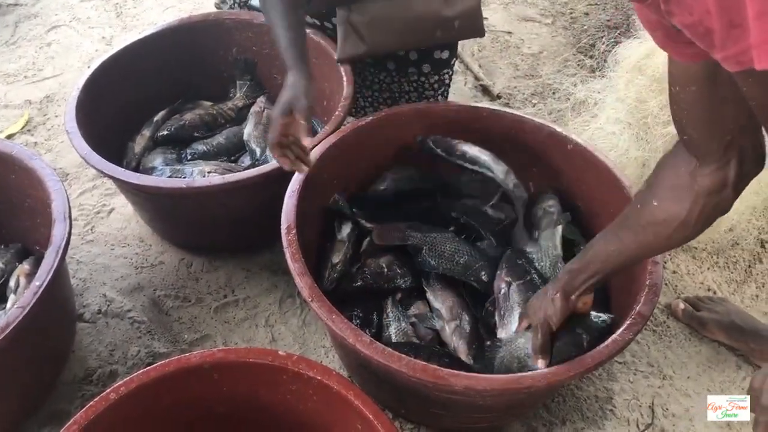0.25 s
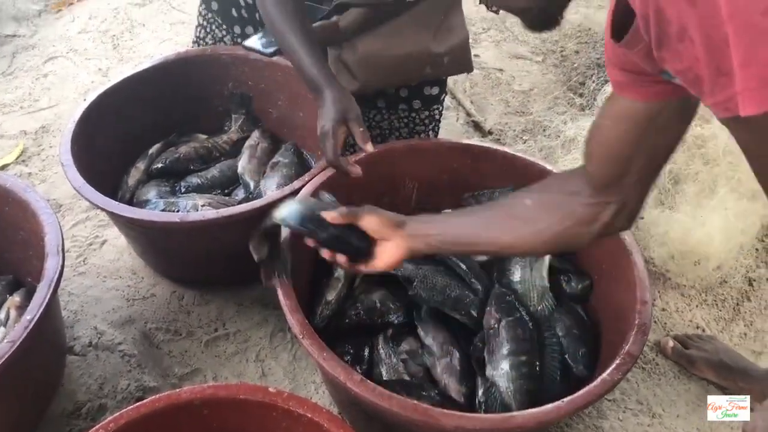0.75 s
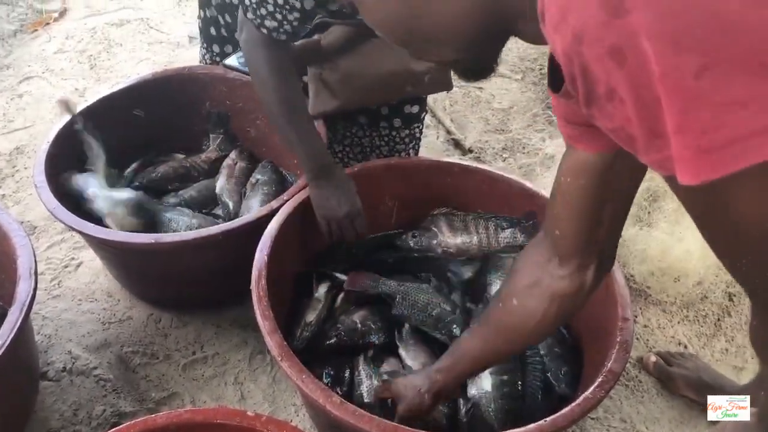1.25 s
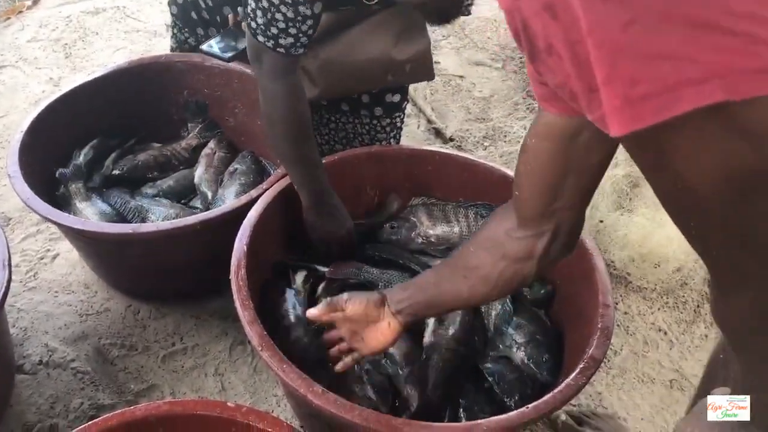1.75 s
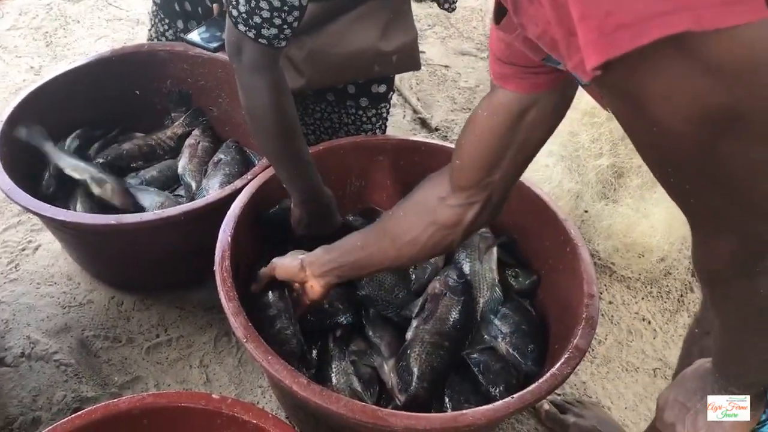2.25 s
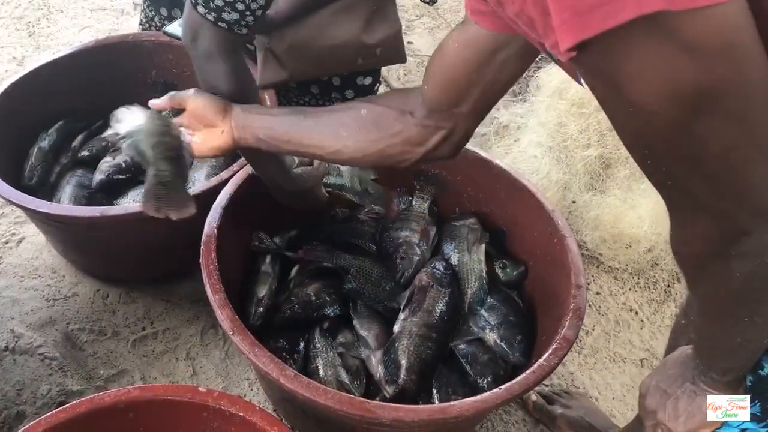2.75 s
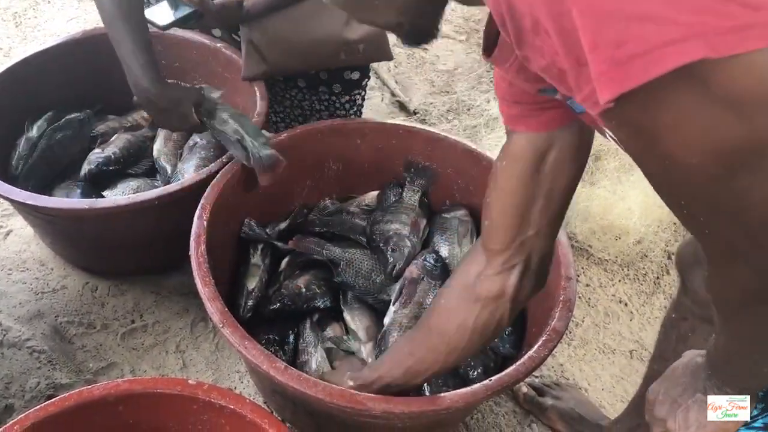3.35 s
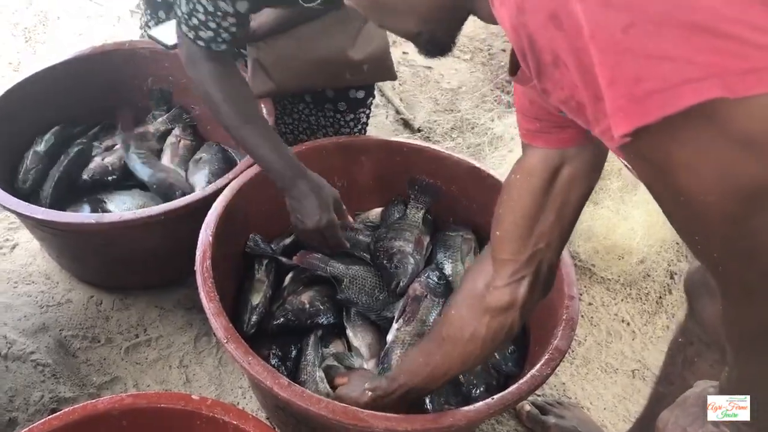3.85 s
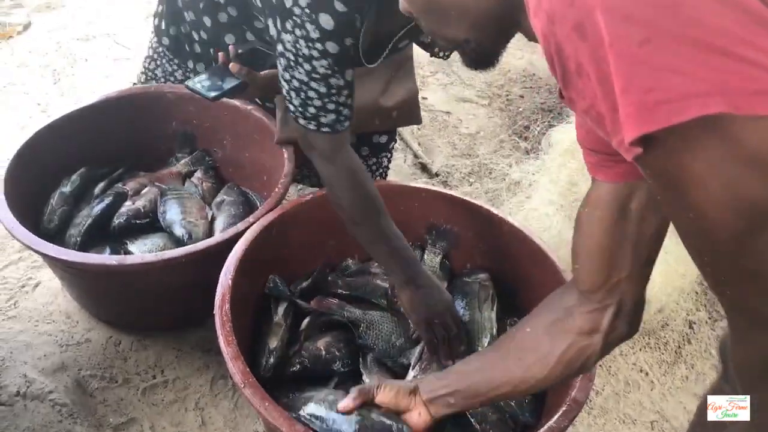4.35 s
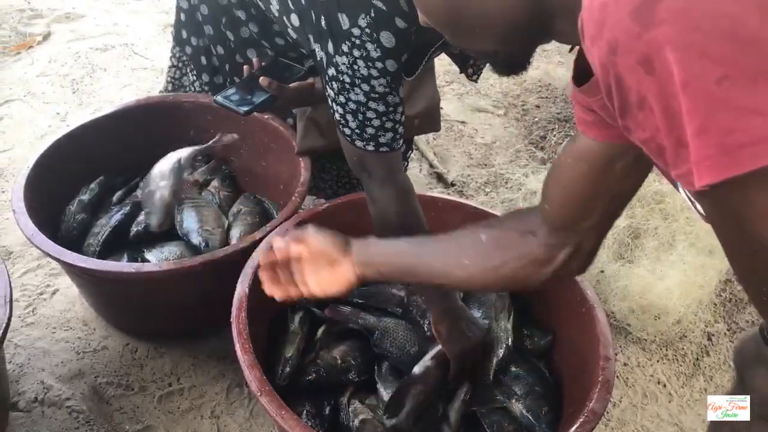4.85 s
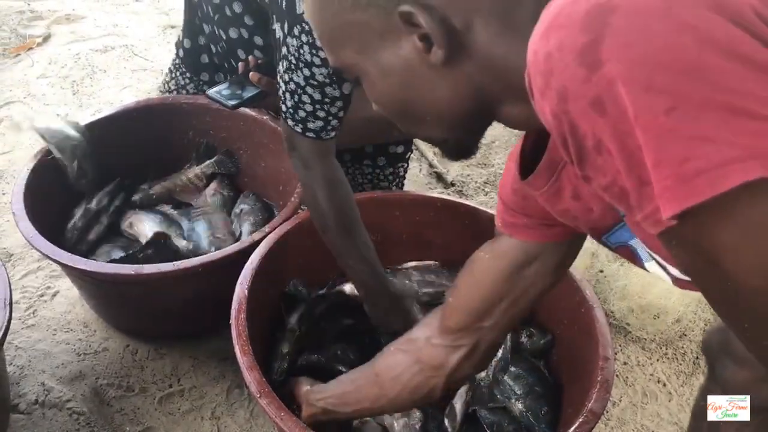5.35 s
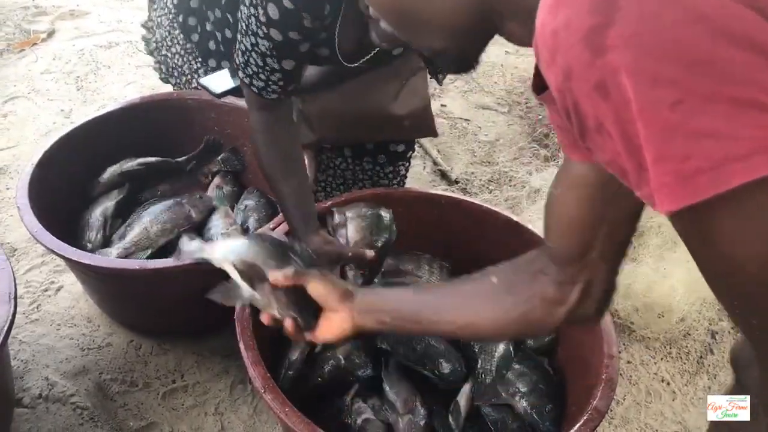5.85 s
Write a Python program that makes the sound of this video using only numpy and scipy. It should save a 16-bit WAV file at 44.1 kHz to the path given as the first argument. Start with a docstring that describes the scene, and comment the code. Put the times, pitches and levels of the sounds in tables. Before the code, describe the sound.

Irregular wet smacks, plops and slithering of live fish handled in plastic tubs outdoors, with soft low puffs of wind.

```python
"""Live fish are sorted by hand between plastic basins outdoors, over the hush of the yard.
From the start wet skins smack as water films tear, bodies slither and plop onto trapped air,
and the basin reflects the impacts. After 2 s the handling eases and wind thumps on the microphone.
At 3.6 s a fish strikes the bare wall, and a flurry of smacks follows near 4 s. More smacks and
puffs of wind come around 5 s, and a fin squeaks on the plastic before the last plops."""
import sys
import numpy as np
from scipy import signal
from scipy.fft import rfft, irfft
from scipy.io import wavfile
from scipy.ndimage import uniform_filter1d

SR = 44100
rng = np.random.default_rng(int(sys.argv[2]) if len(sys.argv) > 2 else 0)


def persist_wave(psi):
    """Save psi, clipped to +-1, as 16-bit WAV."""
    counts = np.round(np.clip(psi, -1, 1) * 32767).astype(np.int16)
    wavfile.write(sys.argv[1], SR, np.atleast_2d(counts).T)


N = 268569

CREEP_S, CREEP_DB = .008, -26  # the film hisses just before it tears
# Spectrum of the tearing film: frequency_hz, gain_db
FILM_SPECTRUM = [(300, -13.5), (1500, -7), (3000, -1.5), (6000, 3.5), (9500, 2), (15000, 7)]
# Wet skin smacks: time_s, level_db, tilt_db_per_octave
SMACKS = [(0.163, -27.5, 0), (0.2905, -13.5, -2), (0.325, -18, 0), (0.3309, -5.5, -6.5), (0.383, -21.5, -3),
          (0.432, -24, 8), (1.069, -25, -1), (1.0939, -20.5, -6), (1.136, -17.5, -3.5), (1.4019, -12.5, -4),
          (1.42, -8, -5), (1.4972, -13, -4), (1.65, -31.5, -10.5), (1.8263, -17, -7.5),
          (1.8645, -19.5, -5.5), (1.915, -13, -0.5), (1.9236, -15, -8), (1.93, -8.5, -7.5),
          (2.1777, -28.5, -3), (2.2578, -28.5, -7.5), (3.007, -30, 0), (3.0955, -27.5, -7),
          (3.6378, -3, -5.5), (3.9892, -10.5, -3.5), (3.993, -20, 2), (4.02, -12, 4.5), (4.0265, -19.5, -4),
          (4.0451, -3, -5), (4.0891, -21.5, -2.5), (4.143, -12, -1.5), (4.1505, -11, -1), (4.177, -26, -4),
          (4.755, -35, -3), (4.854, -34.5, -4), (4.886, -22, 9), (4.934, -36.5, -6), (4.981, -30.5, -8),
          (5.0021, -11, -3.5), (5.007, -13.5, -1), (5.122, -4, 0.5), (5.2885, -27, -5.5),
          (5.363, -28.5, -2.5), (5.7414, -16, -5.5), (5.7648, -20.5, -6.5), (5.804, -9, 24)]
def smack(db, tilt_db, noise, spits, ripples):
    """Film rupture: water creeps, then tears in a spitting hiss, filtered by the gap between skins."""
    t = np.arange(len(noise)) / SR - CREEP_S
    t60_s = 0.03 * np.exp(-.012 * (db + 27.5))  # louder smacks die sooner
    tear = np.clip(t / 0.00063, 0, 1) ** 2 * gain_of(-60 * t / t60_s)
    envelope = tear + gain_of(CREEP_DB) * np.clip(1 - abs(t) / CREEP_S, 0, 1) ** 2
    gap_response = gain_of(2.5 * wander(ripples, .004)[:len(noise) // 2 + 1])
    hiss = coloured(irfft(rfft(noise) * gap_response), FILM_SPECTRUM, tilt_db)
    burst = hiss * gain_of(3.7 * wander(spits, 0.00039)) * envelope
    burst = signal.lfilter([1, -1], [1, -.93], burst)  # a thin film radiates no bass
    return gain_of(db) / 2 * burst * np.linalg.norm(envelope) / np.linalg.norm(burst)


# Bodies landing on trapped air, and at 3.638 s a further hollow ring of the struck wall: start_s, peak_db,
# pitch_hz
PLOPS = [(0.183, -34, 1060), (0.311, -17.5, 1430), (0.33, -17, 2610), (1.137, -29, 1010),
         (1.209, -36.5, 250), (1.257, -30.5, 726), (1.405, -21, 657), (1.8, -25, 507), (1.813, -26.5, 1220),
         (1.849, -25.5, 830), (1.868, -28.5, 640), (1.927, -19.5, 2080), (1.956, -25.5, 1350),
         (2.135, -20, 820), (2.176, -26.5, 1990), (2.584, -38.5, 625), (3.012, -37.5, 328),
         (3.044, -33.5, 565), (3.101, -29.5, 775), (3.638, -16, 1090), (4.029, -14, 685),
         (4.049, -18.5, 414), (4.091, -14.5, 700), (4.172, -32.5, 610), (4.979, -33.5, 1370),
         (5.074, -28, 310), (5.34, -23, 700), (5.734, -32, 990), (5.746, -26.5, 305), (5.77, -33.5, 300),
         (5.795, -31, 282), (5.999, -32.5, 276)]
# Slime bubbles bursting: start_s, peak_db, pitch_hz
POPS = [(0.0716, -39.5, 1840), (1.314, -30.5, 3160), (1.722, -29, 3530), (4.688, -36, 1750),
        (4.887, -32, 2440), (5.5764, -31, 4520), (5.6226, -32, 3960)]
def air_pocket(db, hz, noise, squeeze_s, thud):
    """Damped cavity resonance: squeezed air rings, sinking through hz, over any thud of flesh."""
    t = np.arange(len(noise)) / SR
    impulse = 6.6 * (t == t[50])
    push = (noise + impulse) * np.minimum(t / 0.0013, 1) * np.exp(-t / squeeze_s)
    air = resonance(resonance(push, hz, 0.41 * hz), hz, 0.68 * hz)
    flesh = resonance(resonance(push, 230, 570), 230, 570)
    stretched_s = .03 * np.log1p(1.12 * t / .03)  # pitch falls as the pocket relaxes
    plop = np.interp(stretched_s, t, air + thud * flesh)
    return gain_of(db) * plop / np.abs(plop).max()


# Spectrum of the rattling plastic: frequency_hz, gain_db
RATTLE_SPECTRUM = [(500, -39), (5200, 7), (8000, -6.5)]
# A fish strikes the bare wall: start_s, rattle_db, ring_db, pitch_hz
KNOCKS = [(3.639, -29, -12, 1413)]
def wall_knock():
    """Free vibration: struck plastic gives a short hollow ring and a longer, brighter rattle."""
    t, out = np.arange(SR // 2) / SR, np.zeros(N)
    for s, rattle_db, ring_db, hz in KNOCKS:
        rattle = coloured(rng.standard_normal(len(t)), RATTLE_SPECTRUM)
        rattle *= gain_of(rattle_db - 60 * t / 0.23)
        ring_envelope = gain_of(ring_db) * t / 0.0028 * np.exp(1 - t / 0.0021)
        add(out, s, rattle + ring_envelope * np.sin(2 * np.pi * hz * t))
    return out


# Spectrum of rubbing scales: frequency_hz, gain_db
SCALE_SPECTRUM = [(200, -4), (500, -4.5), (1200, -3.5), (15000, -4.5)]
# The heap's faint wet rustle: time_s, level_db
RUSTLE = [(0, -62.5), (.7, -62), (2.4, -58), (2.8, -67.5), (3.3, -57.5), (3.8, -63.5), (4.6, -60),
          (6.09, -50)]
# Fish sliding over fish: start_s, length_s, level_db
SLIDES = [(0.149, 0.11, -41), (0.269, 0.067, -41.5), (0.426, 0.059, -44.5), (0.627, 0.039, -46.5),
          (0.717, 0.025, -43.5), (1.062, 0.11, -40.5), (1.196, 0.097, -44), (1.303, 0.075, -49),
          (1.36, 0.13, -41), (1.496, 0.073, -44), (1.576, 0.058, -51), (1.651, 0.096, -47.5),
          (1.761, 0.18, -39.5), (1.907, 0.078, -40), (2.104, 0.13, -47.5), (2.242, 0.1, -53.5),
          (2.41, 0.095, -49.5), (2.915, 0.057, -47.5), (2.998, 0.15, -46.5), (3.575, 0.05, -48.5),
          (3.895, 0.013, -33), (3.954, 0.28, -44.5), (4.973, 0.052, -36.5), (5.017, 0.12, -39.5),
          (5.28, 0.079, -42), (5.44, 0.069, -47.5), (5.563, 0.099, -49), (5.718, 0.13, -42.5),
          (5.989, 0.14, -49)]
def slither():
    """Sliding friction: each slide sets in fast and drags out, over the rustle of the heap."""
    hiss = slime() + 0.15 * bubbling()
    out = level_curve(RUSTLE) * coloured(hiss[::-1], SCALE_SPECTRUM)
    for s, length_s, db in SLIDES:
        part = hiss[round(s * SR):][:16384]
        progress = np.arange(len(part)) / SR / length_s
        envelope = np.minimum(progress / 0.078, 1) * np.clip((1.15 - progress) / 0.46, 0, 1)
        tilt_db = 0.25 * (db + 33)  # softer slides are duller
        add(out, s, gain_of(db) * envelope * coloured(part, SCALE_SPECTRUM, tilt_db))
    return out


def slime():
    """Modulated noise: hiss in patches of frequency and time, with crackles of uneven spectrum; rms 1."""
    frames = N // 32 + 5
    real, imag, patches, reach = rng.standard_normal((frames, 65, 4)).T
    patches = unit_rms(uniform_filter1d(uniform_filter1d(patches, size=6, axis=0), size=12, axis=1))
    reach = unit_rms(uniform_filter1d(reach, size=24, axis=0))  # the bands each crackle covers
    chance = rng.random(frames) / 0.06
    strength = np.minimum(-np.log(chance + 1e-9), 3)
    crackle = gain_of(1.6 * strength + 4.3 * reach) * (chance < 1)
    crackle = signal.lfilter([1], [1, -.5], crackle)  # each dies in a few ms
    rushes_db = 3.5 * wander(rng.standard_normal(frames), .0002)
    spectra = (real + 1j * imag) * (gain_of(2.8 * patches + rushes_db) + 0.21 * crackle)
    return unit_rms(signal.istft(spectra, nperseg=128, noverlap=96)[1][:N])


def bubbling():
    """Bubble resonance: air pockets burst at random, each ringing at one of twelve pitches; rms 1."""
    bursts = gain_of(2.8 * np.minimum(rng.exponential(1, N), 4)) * (rng.random(N) < 400 / SR)
    pocket = rng.integers(0, 12, N)
    pitches_hz = np.geomspace(600, 3000, num=12)
    rings = (resonance(bursts * (pocket == k), hz, 0.066 * hz) for k, hz in enumerate(pitches_hz))
    return unit_rms(sum(rings))


# Spectrum of the froth: frequency_hz, gain_db
FROTH_SPECTRUM = [(400, -16), (900, 3.5), (2200, -6), (5000, -23)]
# Air rising between the bodies: start_s, length_s, level_db
GURGLES = [(1.096, 0.16, -51.5), (1.519, .04, -48), (1.568, 0.052, -48.5), (1.652, 0.096, -47),
           (3.19, 0.23, -58.5), (3.858, 0.12, -48), (4.299, .04, -49.5), (5.304, 0.057, -50),
           (5.408, 0.28, -56.5)]
def gurgles():
    """Superposition: ringing bubbles and slime hiss merge into short swells of froth."""
    out = np.zeros(N)
    froth = coloured(bubbling() + 1.2 * slime(), FROTH_SPECTRUM)
    for s, length_s, db in GURGLES:
        part = froth[round(s * SR):][:round(length_s * SR)]
        add(out, s, gain_of(db) * signal.windows.tukey(len(part), .3) * part)
    return out


# A fin on wet plastic: start_s, level_db, pitch_hz
SQUEAKS = [(5.46, -45, 3420)]
def fin_squeak():
    """Friction-driven resonance: a rubbing fin sounds a brief, narrow band of noise."""
    out, window = np.zeros(N), np.hanning(round(0.045 * SR))
    for s, db, hz in SQUEAKS:
        add(out, s, gain_of(db) * window * resonance(rng.standard_normal(len(window)), hz, width_hz=300))
    return out


# Reverberation time of the basin: frequency_hz, t60_s
BASIN_DECAY = [(250, 0.41), (3000, 0.2)]
def basin_echo(x):
    """Reverberation: dense reflections, the treble dying first; three tails crossfade at a steady rate."""
    hz, t, spectra = signal.stft(rng.standard_normal((3, SR // 2)), SR, nperseg=256)
    decay = gain_of(-60 * t / at_frequency(BASIN_DECAY, hz)[:, None])
    tails = signal.istft(spectra * decay, SR, nperseg=256)[1]
    tails /= np.linalg.norm(tails[0])
    crossfades = np.cos(np.pi * (9.8 * np.arange(N) / SR + np.arange(3)[:, None] / 3)) * np.sqrt(2 / 3)
    return signal.fftconvolve(x * crossfades, tails, axes=1)[:, :N].sum(0)


# Spectrum of wind on the microphone: frequency_hz, gain_db
WIND_SPECTRUM = [(25, -43), (55, 1), (110, -9.5), (220, -23), (500, -63)]
# The breeze between puffs: time_s, level_db
BREEZE = [(0, -64), (1.0, -62.5), (1.2, -48), (1.5, -57), (2.05, -58), (2.2, -40.5), (2.6, -47.5),
          (3.1, -50.5), (3.9, -66.5), (4.1, -55.5), (5.3, -40), (5.7, -57.5), (6.09, -58)]
# The strongest puffs: centre_s, level_db
PUFFS = [(1.601, -42.5), (1.708, -41.5), (2.147, -33), (2.199, -29), (2.261, -37.5), (2.322, -32.5),
         (2.386, -29.5), (2.437, -28.5), (2.539, -37), (2.868, -37), (4.093, -36.5), (4.386, -36.5),
         (4.555, -32), (4.838, -35.5), (5.089, -30.5), (5.245, -40), (6.009, -39)]
def wind():
    """Turbulent pressure: puffs shake the membrane for a few low cycles, amid weaker eddies."""
    out, window = np.zeros(N), np.hanning(round(.058 * SR))
    for (s, db), noise in zip(PUFFS, rng.standard_normal((len(PUFFS), 8192))):
        puff = coloured(noise, WIND_SPECTRUM)[:len(window)] * window
        add(out, s - len(window) / 2 / SR, gain_of(db) * puff / np.abs(puff).max() * 2)
    eddies = unit_rms(gain_of(3.5 * wander(rng.standard_normal(N), seconds=0.023)))
    return out + level_curve(BREEZE) * eddies * coloured(rng.standard_normal(N), WIND_SPECTRUM)


# Spectrum of the open air: frequency_hz, gain_db
YARD_SPECTRUM = [(24, -61), (40, 9), (77, 1), (249, 3), (412, -7), (5310, -16), (14500, -28)]
def yard():
    """Ambient noise: a low outdoor hush whose level barely drifts."""
    level_db = -54 + 0.58 * wander(rng.standard_normal(N), seconds=0.48)
    return gain_of(level_db) * coloured(rng.standard_normal(N), YARD_SPECTRUM)


def gain_of(db):
    """Decibels to amplitude."""
    return 10 ** (np.asarray(db) / 20)


def unit_rms(x):
    """Normalisation to rms 1."""
    return x / np.sqrt(np.mean(x ** 2) + 1e-20)


def at_frequency(points, hz):
    """Interpolation of a table on a log-frequency axis."""
    f, value = np.transpose(points)
    return np.interp(np.log(hz + 1), np.log(f + 1), value)


def level_curve(rows):
    """Amplitude envelope, interpolated in decibels."""
    return gain_of(np.interp(np.arange(N) / SR, *np.transpose(rows)))


def add(mix, s, sound):
    """Superposition of a sound at second s."""
    part = mix[round(s * SR):][:len(sound)]
    part += sound[:len(part)]


def coloured(x, points, tilt_db=0.):
    """Spectral shaping by a table, tilted by tilt_db per octave about 6 kHz; rms 1."""
    hz = np.fft.rfftfreq(len(x), 1 / SR)
    slope_db = tilt_db * np.log2(np.maximum(hz, 1000) / 6000)
    return unit_rms(irfft(rfft(x) * gain_of(at_frequency(points, hz) + slope_db), len(x)))


def resonance(x, hz, width_hz):
    """A two-pole resonator; rms 1."""
    r = np.exp(-np.pi * width_hz / SR)
    return unit_rms(signal.lfilter([1, 0, -1], [1, -2 * r * np.cos(2 * np.pi * hz / SR), r * r], x))


def wander(noise, seconds):
    """Random fluctuation: noise smoothed over seconds * SR points; rms 1."""
    size = max(int(seconds * SR), 2)
    return unit_rms(uniform_filter1d(uniform_filter1d(noise, size), size))


def scene():
    """Linear mixing: impacts and their reflections, the stirring heap, wind and yard, in mono."""
    impacts = np.zeros(N)
    for (s, db, tilt_db), noises in zip(SMACKS, rng.standard_normal((len(SMACKS), 3, 4096))):
        add(impacts, s - CREEP_S, smack(db, tilt_db, *noises))
    for (s, db, hz), noise in zip(PLOPS, rng.standard_normal((len(PLOPS), 2048))):
        add(impacts, s, air_pocket(db, hz, noise, squeeze_s=0.0054, thud=0.47))
    for (s, db, hz), noise in zip(POPS, rng.standard_normal((len(POPS), 2048))):
        add(impacts, s, air_pocket(db, hz, noise, squeeze_s=0.0016, thud=0))
    echo = gain_of(-15.5) * basin_echo(impacts)
    return (impacts + echo + wall_knock() + slither() + gurgles() + fin_squeak() + wind() + yard())[None]


def record(dry):
    """Frequency response: the microphone port loses a narrow treble band, then a low-pass follows."""
    hz = np.fft.rfftfreq(N, 1 / SR)
    port_db = -2 * np.exp(-((hz - 10500) / 900) ** 2)
    heard = irfft(rfft(dry) * gain_of(port_db), N)
    low_pass = signal.firwin(511, cutoff=15900, window=("kaiser", 9), fs=SR)
    return signal.oaconvolve(heard, low_pass[None], "same")


dry = scene()
out = record(dry)
persist_wave(out)
```